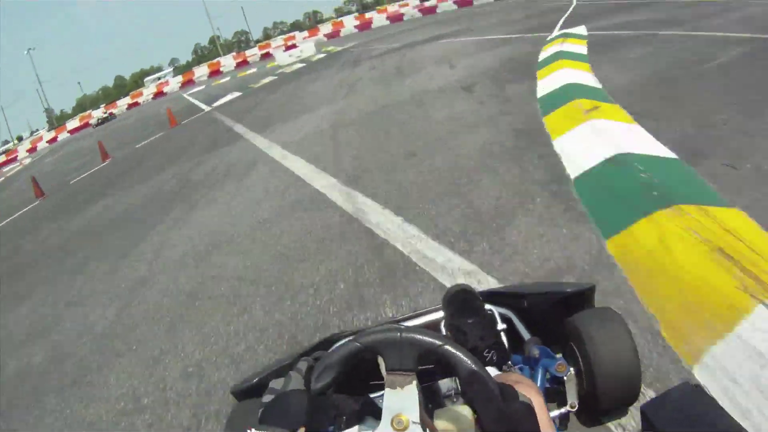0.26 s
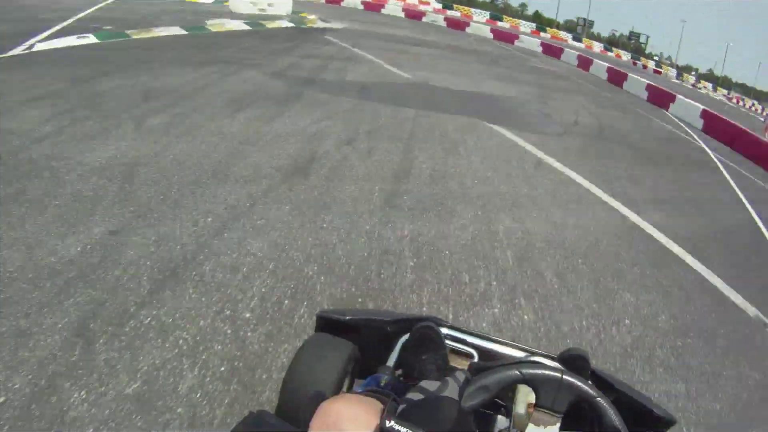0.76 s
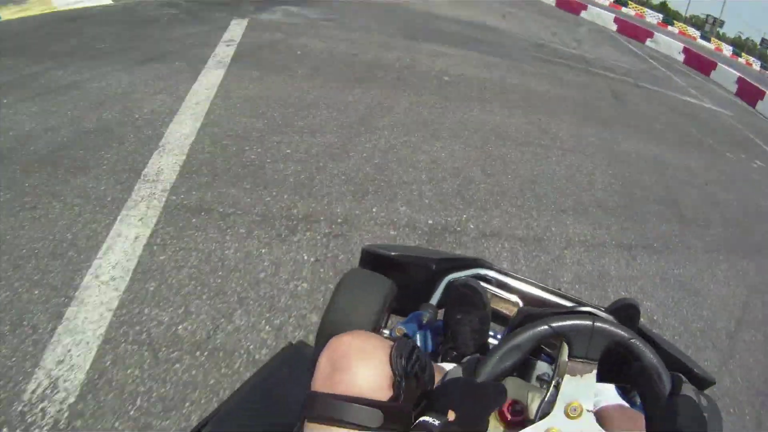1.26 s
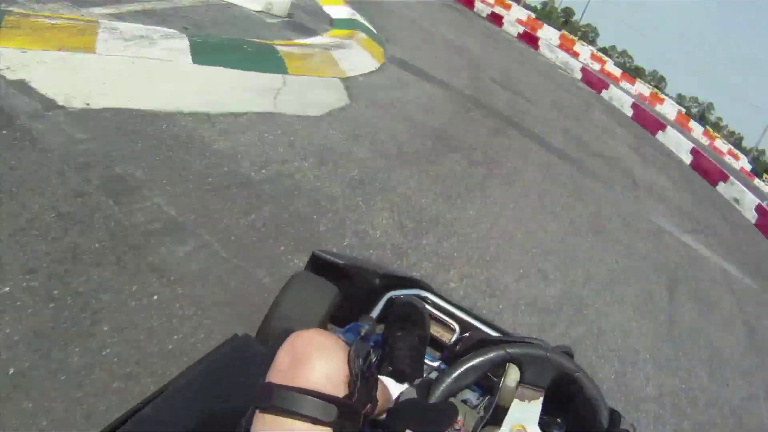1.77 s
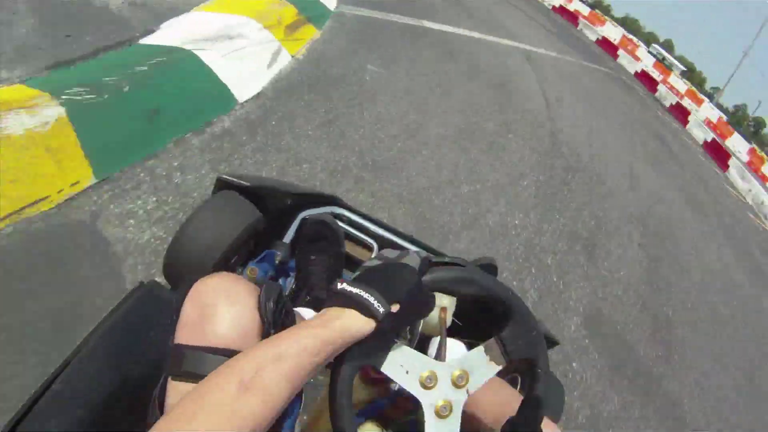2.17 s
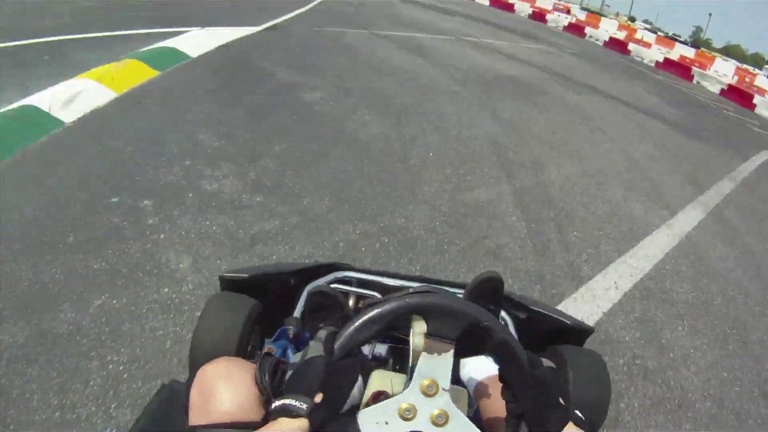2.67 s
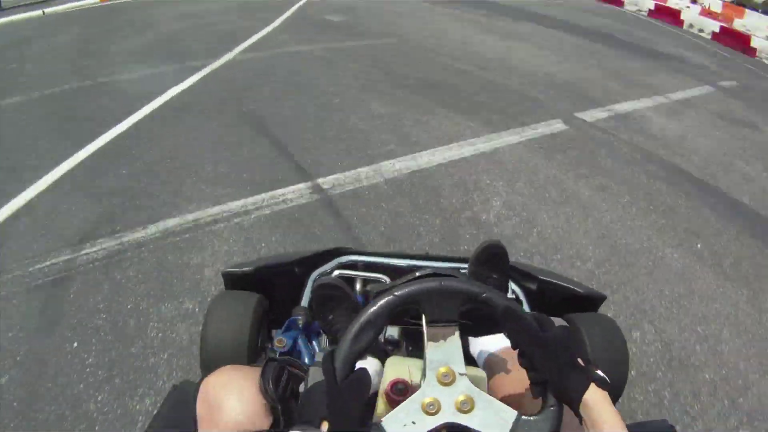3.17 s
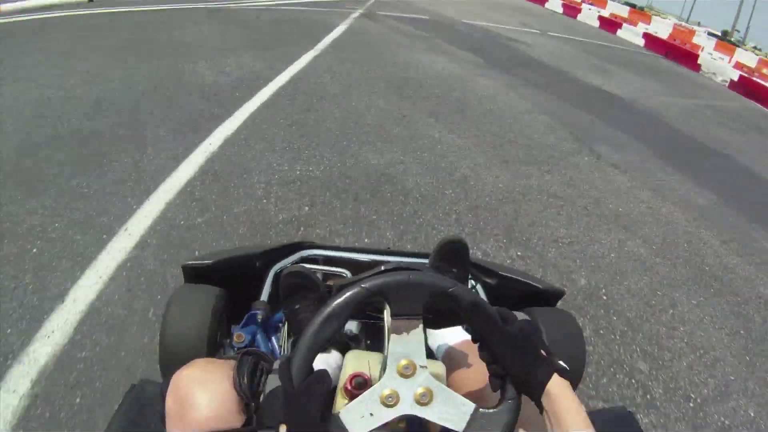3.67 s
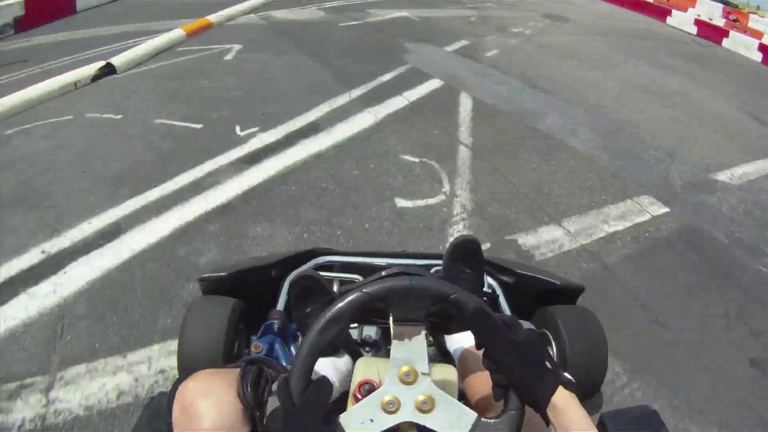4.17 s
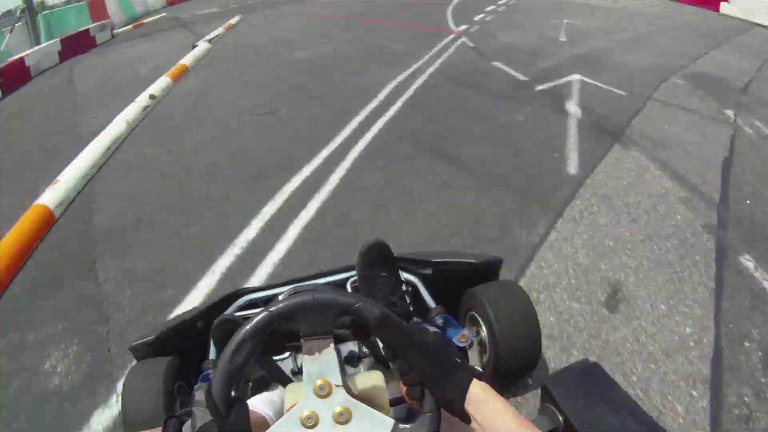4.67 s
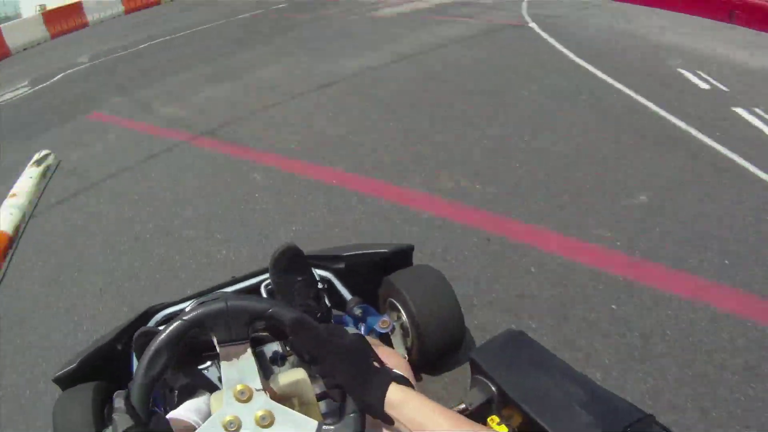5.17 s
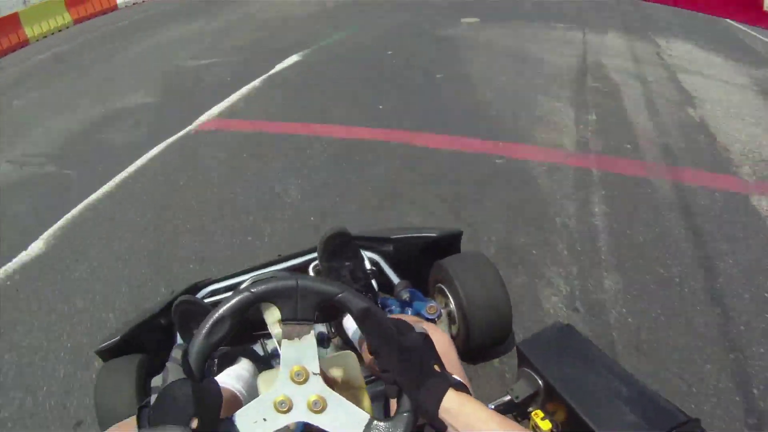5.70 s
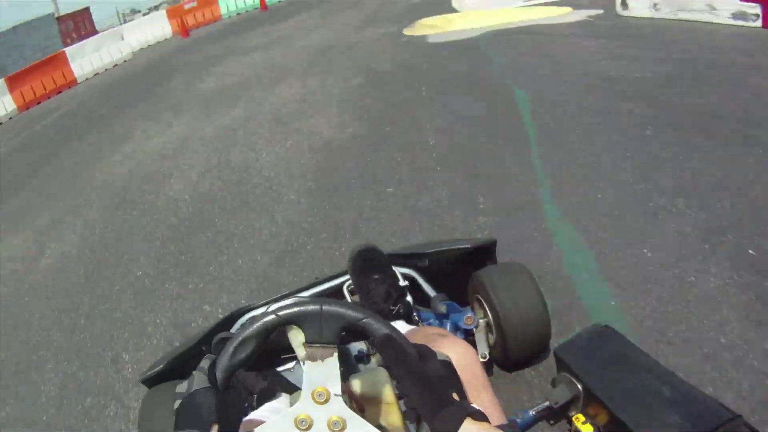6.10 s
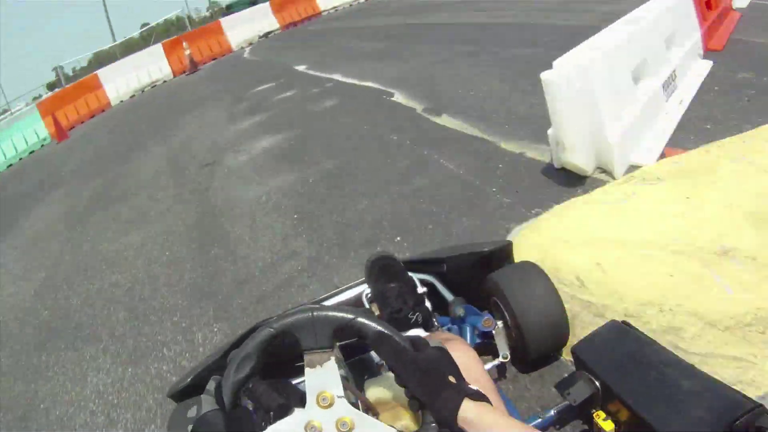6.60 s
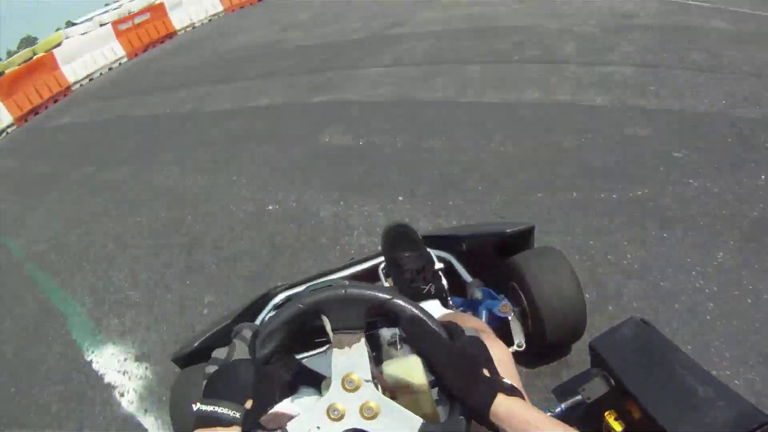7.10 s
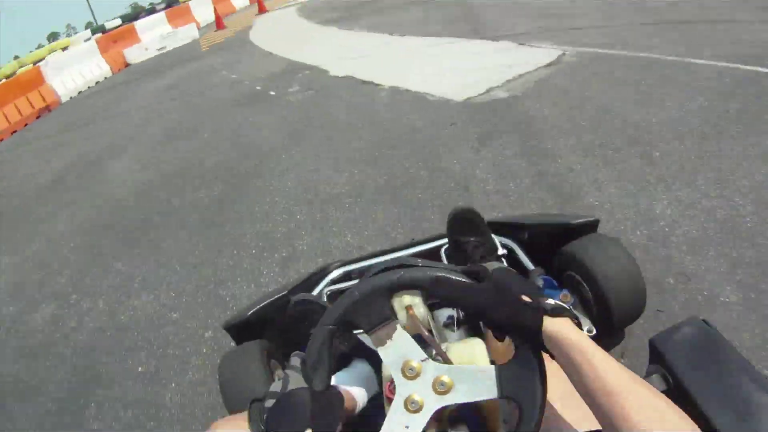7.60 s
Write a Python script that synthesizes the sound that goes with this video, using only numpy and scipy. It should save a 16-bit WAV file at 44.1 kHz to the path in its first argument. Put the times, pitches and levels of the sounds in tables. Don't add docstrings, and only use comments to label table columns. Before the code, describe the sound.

On an outdoor kart track, a one-cylinder engine putters fast and rattles close to a microphone sealed in a plastic case. It eases off, pulls again through a bend, lifts and picks up once more. Tyres roar and scuff, a deep wobble swells over bumps, a sharp slap lands early on, and a tiny chirp precedes heavy thuds at the end.

```python
import sys
import numpy as np
from scipy import signal
from scipy.fft import rfft, irfft
from scipy.io import wavfile
from scipy.ndimage import uniform_filter1d

SR = 44100
rng = np.random.default_rng(int(sys.argv[2]) if len(sys.argv) > 2 else 0)


def volts_from_db(level):
    exponent = np.asarray(level, float) / 20
    return 10 ** exponent


def pcm_store(signal):
    levels = np.round(np.clip(np.atleast_2d(signal), -1, 1) * 32767)
    wavfile.write(sys.argv[1], SR, levels.astype(np.int16).T)


N = 346185
T = np.arange(N) / SR


def level(x, db):
    return x * volts_from_db(db) / np.sqrt(np.mean(x ** 2))


def columns(table):
    s, *cols = np.transpose(table)
    return [np.interp(T, s, c) for c in cols]


def mode(x, hz, width):
    return signal.lfilter(*signal.iirpeak(hz, hz / width, SR), x)


def walk(rate):
    k = int(SR / rate / 8)
    held = np.repeat(rng.standard_normal(N // (8 * k) + 1), k)
    slewed = uniform_filter1d(uniform_filter1d(held, k), k)
    return np.repeat(1.3 * slewed, 8)[:N]


def swell(s, rise, fall):
    t = T[::64] - s
    return np.repeat(np.exp(-(t / np.where(t < 0, rise, fall)) ** 2), 64)[:N]


# [pitch_hz, level_db per Hz]
ROAR = [(55, -9), (91, -5.5), (145, -9.5), (209, -14.5), (479, -15.5), (738, -23.5), (900, -17)]


def road(hum_db, clatter_db, throttle_db):
    hz, db = np.transpose(ROAR)
    bass_db = hum_db - 11 - 1.1 * np.clip(throttle_db + 8, -6, 0)
    out = 0
    for f in 60 * 2 ** (np.arange(8) / 2):
        noise = mode(mode(rng.standard_normal(N), f, f / 2), f, f / 2)
        band = level(noise, np.interp(np.log(f), np.log(hz), db) + 10 * np.log10(f / 100))
        follow_db = bass_db + 4.0 if f < 200 else clatter_db - 12
        out = out + band * volts_from_db(1.6 * walk(8.3) + follow_db)
    return out


# [start_s, end_s]
CHIRP_SPAN = (7.145, 7.235)


def squeak():
    pitch_hz, level_db = 2870, -33.5
    start_s, end_s = CHIRP_SPAN
    envelope = np.sin(np.pi * np.clip((T - start_s) / (end_s - start_s), 0, 1) ** 1.2)
    flutter_db = 2.0 * walk(90)
    tone = np.sin(2 * np.pi * np.cumsum(pitch_hz * (1 + 0.0063 * walk(61))) / SR)
    return volts_from_db(level_db + flutter_db) * envelope * tone


# [start_s, level_db of sway, pitch_hz of sway]
CORNER_SWAY = [(0, -36.5, 35.2), (.4, -35.5, 41.65), (1.2, -33.5, 40.6), (1.9, -29, 41.5),
               (2.6, -24, 39.72), (2.85, -31, 39.56), (3.5, -33.5, 42.44), (4.3, -34, 40.1),
               (5.15, -40.5, 35.7), (5.7, -31, 42.18), (6.1, -29.5, 41.16), (6.5, -22.5, 41.6),
               (6.95, -24.5, 42.42), (7.85, -26.5, 42.4)]
# [peak_s, level_db at peak]
ROAD_BUMPS = [(0.25, -27.5), (0.53, -28.0), (1.45, -32), (1.55, -28.5), (1.8, -28), (1.93, -22.5),
              (2.14, -17), (2.35, -19.5), (2.46, -15.5), (2.95, -24.0), (3.16, -25.5), (3.83, -28.5),
              (4.07, -28), (4.89, -26), (5.38, -27.5), (5.64, -30), (5.81, -30), (5.9, -35), (6.28, -25),
              (6.38, -22), (6.71, -20.5), (6.85, -36), (7.18, -17), (7.35, -19.0), (7.5, -22),
              (7.61, -17.0), (7.73, -20), (7.81, -20.0)]


def mount(cycles, throttle_db):
    rise_s, fall_s = 0.032, 0.025
    shake_db, sway_hz = columns(CORNER_SWAY)
    bump_power = sum(volts_from_db(2 * db) * swell(s, rise_s, fall_s) for s, db in ROAD_BUMPS)
    swing = np.sqrt(volts_from_db(2 * shake_db + 2.5 * walk(7)) + bump_power)
    sway = np.sin(2 * np.pi * np.cumsum(sway_hz * (1 + 0.0401 * walk(10))) / SR)
    lurch = mode(mode(rng.standard_normal(N), 28.2, 9.5), 28.2, 9.5)
    lurch = lurch + 0.42 * mode(rng.standard_normal(N), 16.3, 9.3)
    crank_db = -3 + shake_db + 0.24 * throttle_db + 2.5 * walk(6)
    crank = np.sqrt(2) * volts_from_db(crank_db) * np.sin(4 * np.pi * cycles + 0.6 * walk(10.0))
    return swing * (level(sway, -1.0) + level(lurch, -9.5)) + crank


# [pitch_hz, width_hz, level_db]
CASE_MODES = [(730, 222, -8), (969.5, 92, 4.5), (1180, 168, 3), (1690, 270, -4), (2065, 118, 4),
              (2298, 323, -0.5), (2682, 279, -3), (3588, 392, -8.5), (4860, 300, -12.5), (5550, 680, -20)]


def case(x, bright_db, scatter_db=None):
    out = 0
    for k, (hz, width, db) in enumerate(CASE_MODES):
        favour_db = 0 if scatter_db is None else scatter_db[k]
        drive_db = db + bright_db * np.log2(hz / 1000) + favour_db
        out = out + (-1) ** k * mode(x * volts_from_db(drive_db), hz, width)
    return out


# [start_s, level_db at peak, middle_db of middle modes, upper_db of upper modes]
SLAPS = [(1.776, -19, 4, 10), (2.4324, 2.5, -0.5, -4), (2.4437, -7.5, 4, -8), (6.093, -9, 3.5, 2),
         (7.581, -5.5, 0, -9), (7.604, -15.5, 3, -8), (7.685, -14, -8, -6), (7.702, -8, -11, -19),
         (7.711, -13.5, 6, -4), (7.808, -28, 8, -6), (7.841, -13.5, -1, -2)]
# [start_s, level_db at peak, pitch_hz, decay_s]
JOLTS = [
    (2.432, -22, 265, 0.0031),
    (2.437, -18, 123, 0.0093),
    (5.93, -35.5, 111, 0.012),
    (6.09, -31.5, 123, 0.0079),
    (7.582, -20, 104.4, 0.0099),
    (7.693, -9.5, 130.5, 0.0065),
    (7.699, -11, 473, 0.00083),
    (7.703, -9, 82, 0.0058),
    (7.84, -9, 119, 0.016),
]


def knocks():
    out = np.zeros(N + SR)
    t = T[:SR // 8]
    hz = np.transpose(CASE_MODES)[0]
    for s, peak_db, middle_db, upper_db in SLAPS:
        slap = np.exp(-t / .0001) + 0.023 * np.exp(-t / 0.0005) * rng.standard_normal(len(t))
        colour_db = np.where(hz > 3000, upper_db, np.where(hz > 1500, middle_db, 0))
        colour_db = colour_db - 7 * (abs(hz - 1700) < 200)
        ring = case(slap, 0, colour_db) * np.exp(-(t / .004) ** 2)
        out[int(s * SR):][:len(t)] += volts_from_db(peak_db) * ring / np.abs(ring).max()
    for s, peak_db, thud_hz, decay in JOLTS:
        envelope = np.e * t / decay * np.exp(-t / decay)
        out[int(s * SR):][:len(t)] -= volts_from_db(peak_db) * envelope * np.sin(2 * np.pi * thud_hz * t)
    return out[:N]


def duck():
    threshold_db, share, attack_s, release_s = -15, 0.47, .012, 0.16
    gain_db = 0
    for s, peak_db, *_ in SLAPS:
        late = np.maximum(T - s, 0)
        dip = np.minimum(late / attack_s, 1) ** 2 * np.exp(-late / release_s)
        gain_db = gain_db - share * max(peak_db - threshold_db, 0) * dip
    return gain_db


# [multiple of the firing rate, level_db]
ENGINE_ORDERS = [(3, -8), (4, -2), (5, -2), (6, 0), (7, -8), (8, -9), (9, -10), (10, -16), (11, -10),
                 (12, -9), (13, -18), (14, -17), (15, -11), (16, -11), (17, -12), (18, -11), (19, -19),
                 (25, -13), (26, -7), (27, -9), (28, -10), (29, -10), (30, -11), (31, -16)]


def exhaust(cycles, throttle_db):
    turn = cycles - .4 + .002 * walk(10)
    mesh = 1.1 * walk(30)
    tones = 0
    for k, db in ENGINE_ORDERS:
        phase = 2 * np.pi * k * turn + .08 * k ** 2
        phase = phase + (k > 20) * mesh * (1 + k % 2)
        tones = tones + volts_from_db(db + 2.0 * walk(5)) * np.cos(phase)
    return level(tones, -0.75) * volts_from_db(.6 * np.clip(throttle_db + 8, -12, 0))


def clatter(cycles, throttle_db):
    phase, count = cycles % 1 - .3, cycles.astype(int)
    grit = volts_from_db(1.78 * rng.exponential(size=N)) * rng.standard_normal(N)
    flicker_db = [.7 * walk(25) for _ in CASE_MODES]
    steady = case(level(grit, 0) * volts_from_db(1.0 * walk(12) + 0.75 * walk(60)), -0.49, flicker_db)
    gate = np.exp(-np.where(phase < 0, (phase / .08) ** 2, phase / .125))
    colour_db = 1.8 * rng.standard_normal((count[-1] + 1, len(CASE_MODES)))[count].T
    burst = case(gate * volts_from_db(1.5 * walk(500)) * rng.standard_normal(N), 1.74, colour_db)
    mix = level(steady, 0) + volts_from_db(throttle_db) * level(burst, 0)
    return mix / np.sqrt(1 + volts_from_db(2 * throttle_db))


# [start_s, pitch_hz of firing]
ENGINE_SPEED = [(0, 28.86), (.5, 27.62), (1.01, 25.24), (1.48, 25.01), (2, 26.44), (2.34, 26.54),
                (2.63, 23.93), (3.12, 23.41), (3.4, 23.71), (3.99, 24.65), (4.3, 25.56), (4.64, 25.97),
                (5.3, 28.18), (5.99, 24.61), (6.57, 24.45), (6.96, 23.21), (7.54, 23.66), (7.85, 23.37)]
# [start_s, level_db of firing burst over steady clatter]
THROTTLE_PEDAL = [(0, -11.5), (1.38, -19.5), (1.43, -0.5), (2.0, -1), (2.4, -4.5), (2.8, -3.5), (3.6, -2),
                  (3.9, -5), (4.6, -7), (5.33, -6), (5.4, -14.5), (6.27, -16), (6.32, -2), (6.8, -4),
                  (6.92, -19), (7.05, -8.5), (7.5, -7.5), (7.85, -2.5)]
# [start_s, level_db of clatter]
WORK = [(0, -32.5), (.55, -30.5), (.78, -33), (1, -37), (1.41, -36.5), (1.45, -32.5), (1.85, -30.5),
        (2.42, -30), (2.9, -32.5), (3.7, -33.5), (4.4, -31), (5.32, -30), (5.4, -32.5), (5.75, -36.5),
        (6.28, -32), (6.4, -30.5), (7.45, -30), (7.85, -31.5)]
# [peak_s, level_db of rise]
TYRE_SCUFFS = [
    (.31, 4),
    (1.2, 4.5),
    (1.79, 1.5),
    (2.94, 3.5),
    (5.949, 7),
    (6.09, 4),
    (6.22, 6),
    (7.2, 2.5),
]


def scene():
    cycles = .93 + np.cumsum(columns(ENGINE_SPEED)[0]) / SR
    throttle_db, effort_db = columns(THROTTLE_PEDAL)[0], columns(WORK)[0]
    duck_db, scuff_s = duck(), 0.012
    scuff_db = sum(db * swell(s, scuff_s, scuff_s) for s, db in TYRE_SCUFFS)
    clatter_db = effort_db + duck_db + scuff_db
    hum_db = -39 + .45 * (effort_db + 32) + .45 * np.clip(throttle_db + 8, -8, 0) + duck_db
    background = road(hum_db, clatter_db, throttle_db) + squeak()
    handling = mount(cycles, throttle_db) + knocks()
    engine = volts_from_db(hum_db) * exhaust(cycles, throttle_db) + volts_from_db(clatter_db) * clatter(cycles, throttle_db)
    return (background + handling + engine)[None]


def roll_off(x):
    return signal.sosfilt(signal.butter(12, 10960, fs=SR, output="sos"), x)


# [from_hz, to_hz, share of frames kept 0-1, level_db]
FLICKER_BANDS = [(10200, 10480, .75, -2), (10480, 10900, .17, -7)]


def record(dry):
    hold_hz = 12000
    hz = np.arange(N // 2 + 1) * SR / N
    spectrum = rfft(0.9 * np.tanh(dry / 0.94)) / (1 + (hz / 5850) ** 60)
    faded = irfft(spectrum * hz / np.maximum(hold_hz - hz, 1), N)
    image = rfft(faded * 2 * np.cos(2 * np.pi * hold_hz * T))
    out = irfft(spectrum + volts_from_db(-.2) * image * (hz < 10200), N)
    for lo, hi, share, db in FLICKER_BANDS:
        frames = np.repeat(rng.random(N // 1024 + 1) < share, 1024)[:N]
        kept = uniform_filter1d(frames * 1., 400)
        out = out + volts_from_db(db) * kept * irfft(image * (hz >= lo) * (hz < hi), N)
    return roll_off(out)


dry = scene()
out = record(dry)
pcm_store(out)
```